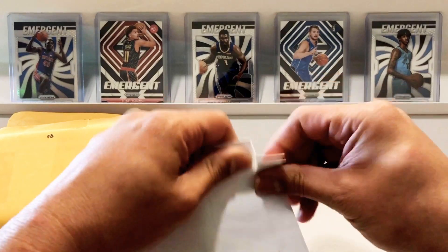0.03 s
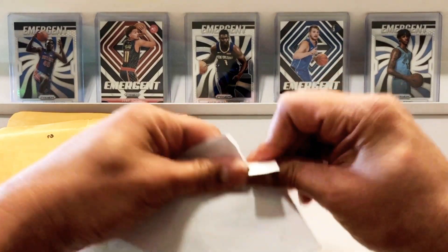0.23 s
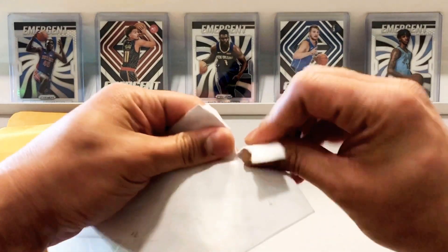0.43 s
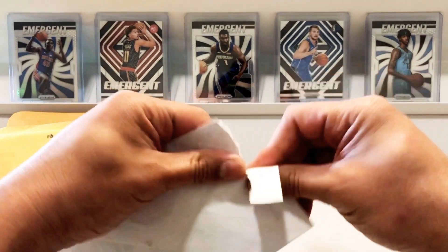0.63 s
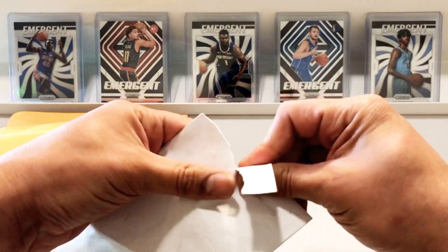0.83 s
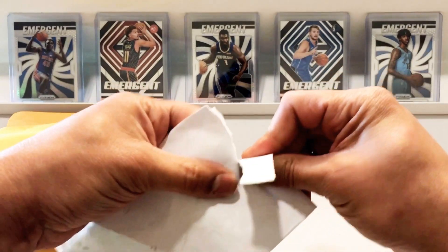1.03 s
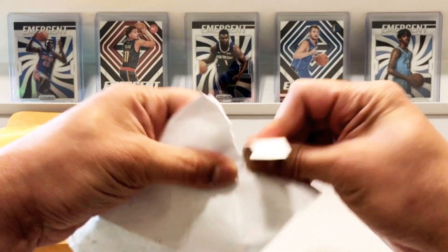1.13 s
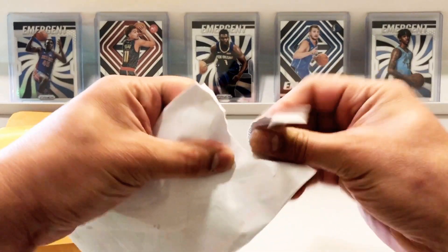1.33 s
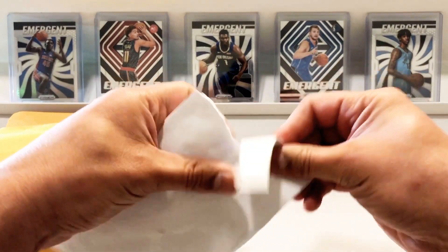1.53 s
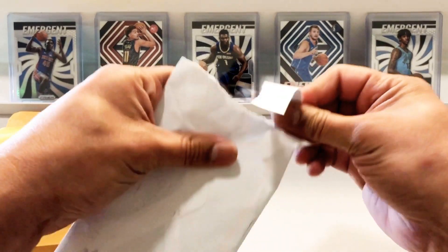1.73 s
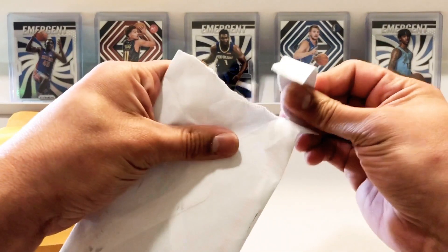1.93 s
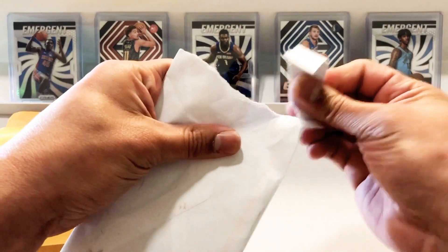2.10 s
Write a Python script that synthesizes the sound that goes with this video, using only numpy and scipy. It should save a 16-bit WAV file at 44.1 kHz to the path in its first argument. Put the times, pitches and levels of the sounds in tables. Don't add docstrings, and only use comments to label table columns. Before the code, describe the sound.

Close, dry paper tearing in a quiet indoor room, with crisp irregular crackling and hard crease snaps over soft rustle, easing midway, then one loud snap and bright ripping at the end; faint rumble and hiss beneath.

```python
import sys
import numpy as np
from scipy import signal
from scipy.fft import rfft, irfft
from scipy.io import wavfile

SR = 44100
rng = np.random.default_rng(int(sys.argv[2]) if len(sys.argv) > 2 else 0)


def generate_wav(signal):
    frames = np.transpose(np.atleast_2d(signal))
    scaled = np.clip(frames, -1, 1) * 32767
    pcm = np.round(scaled).astype(np.int16)
    wavfile.write(sys.argv[1], SR, pcm)


def level_to_linear(level):
    exponent = np.asarray(level, float) / 20
    return 10 ** exponent


N = 95432
T = np.arange(N) / SR

# f/Hz, width/Hz, level/dB
BODY = [
    (449.4, 207, 1.5),
    (625, 126, -1.5),
    (875, 151, 4),
    (1573, 226, -1.5),
    (2330, 860, -7),
]
# f/Hz, width/Hz, level/dB
EDGE = [
    (3460, 2170, -13),
    (4494, 575, -1.5),
    (5344, 880, -4),
    (7120, 2150, -8),
    (8745, 1820, -0.5),
    (10600, 1930, -5.5),
    (12300, 8300, -19.5),
    (15200, 2600, -24),
]
TILT_HZ = 6230


def rms_one(x):
    return x / np.sqrt(np.mean(x ** 2) + 1e-20)


def resonance(x, hz, width):
    r = np.exp(-np.pi * width / SR)
    poles = [1, -2 * r * np.cos(2 * np.pi * hz / SR), r * r]
    return signal.lfilter([(1 - r * r) / 2, 0, (r * r - 1) / 2], poles, x + 1e-18)


def burst(hold_s, fall_s):
    rise_s = 0.00008
    t = np.arange(int(0.03 * SR)) / SR
    return np.minimum(t / rise_s, 1) * np.exp(-np.maximum(t - hold_s, 0) / fall_s)


def random_signs(envelope):
    return envelope * rng.choice([-1., 1.], len(envelope))


def strike(s, peak_db, modes, envelope, tilt_db):
    lag_s, colour_spread_db = 0.0008, 1.5
    out = np.zeros(N + SR)
    for when, peak, tilt in zip(s, peak_db, tilt_db + 0 * s):
        push = random_signs(envelope)
        colour = colour_spread_db * rng.standard_normal(len(modes))
        hit = 0
        for k, (hz, width, level_db) in enumerate(modes):
            rung = rms_one(resonance(resonance(push, hz, width), hz, 2 * width))
            gain = level_to_linear(level_db + colour[k] + tilt * np.log2(hz / TILT_HZ))
            hit = hit + (-1) ** k * rung * np.sqrt(width) * gain
        i = int((when + lag_s) * SR)
        out[i:i + len(hit)] += level_to_linear(peak) * hit / np.abs(hit).max()
    return out[:N]


def grains(per_s, spread_db, hiss, modes, uneven=1.0, tilt_db=0):
    slip_s, slip_colour_db = 0.0011, 4
    gap, size = rng.exponential(1, (2, 2000))
    colour = slip_colour_db * rng.standard_normal((2000, len(modes)))
    at = np.cumsum((1 - uneven + uneven * gap) * SR / per_s).astype(int)
    inside = at < N
    noise = rng.standard_normal((2, N))
    out = 0
    for k, (hz, width, level_db) in enumerate(modes):
        sizes = np.zeros(N)
        sizes[at[inside]] = level_to_linear(spread_db * np.minimum(size, 2.6) + colour[:, k])[inside]
        slip_train = signal.fftconvolve(sizes, burst(slip_s / 2, slip_s))[:N]
        friction = noise[k % 2] * (hiss + rms_one(slip_train))
        rung = resonance(resonance(friction, hz, width), hz, 2 * width)
        out = out + level_to_linear(level_db + tilt_db * np.log2(hz / TILT_HZ)) * rung
    return rms_one(out)


def air():
    air_db, hum_db, hum_hz, hum_width_hz = -36.5, -65.5, 121.3, 1.36
    # f/Hz, level/dB
    air_spectrum = [
        (3, 6),
        (15, 2),
        (28, -9.5),
        (50, -25.5),
        (150, -32),
        (900, -43.5),
        (1300, -47.5),
        (16000, -70),
    ]
    hz, db = np.transpose(air_spectrum)
    f = np.maximum(np.fft.rfftfreq(N, 1 / SR), 1)
    shape = level_to_linear(np.interp(np.log(f), np.log(hz), db)) * (f > 1)
    bed = irfft(rfft(rng.standard_normal(N)) * shape, N)
    hum = resonance(rng.standard_normal(N + SR), hum_hz, hum_width_hz)[SR:]
    fade = np.clip(np.minimum(T, T[-1] - T) / 0.032 + 0.63, 0, 1)
    return level_to_linear(air_db) * fade * rms_one(bed) + level_to_linear(hum_db) * rms_one(hum)


def rustle():
    # t/s, level/dB, body level/dB
    finger_moves = [(0, -45.5, -3.5), (.11, -48.5, -14), (0.288, -49.5, -1), (.365, -59.5, 1),
                    (.41, -44, -8.5), (.56, -50, 2), (.645, -50, -6.5), (.86, -48.5, -32), (.96, -57.5, 7),
                    (1.14, -47, -2), (1.235, -58.5, -6), (1.375, -60, -7), (1.43, -48, -6.5),
                    (1.6, -41, -13), (1.705, -50, -22), (1.85, -46, -15), (1.9, -58.5, -17),
                    (2.16, -51.5, -3.5)]
    s, db, body_db = np.transpose(finger_moves)
    level = level_to_linear(np.interp(T, s, db) - 1.5)
    fine = grains(360, 3.5, 0.99, EDGE)
    dull = grains(70, 1.6, 1.0, BODY)
    return level * (fine + level_to_linear(np.interp(T, s, body_db)) * dull)


def buckles():
    kick, fall_s = 7.15, 0.0021
    # t/s, peak/dB, upper mode tilt/dB, hold/ms
    sheet_pops = [(0.019, -38, -11, 2.9), (0.079, -31.5, 0.5, 2), (0.1, -31.5, 4, 1.6),
                  (0.127, -32, 2, 3.9), (0.212, -27.5, -3.5, 3), (0.221, -35.5, 6, 1.6),
                  (0.29, -27.5, -1.5, 2.2), (0.427, -31.5, -7.5, 1.9), (0.441, -27.5, -4, 1.1),
                  (0.468, -26.5, -4.5, 2.5), (0.491, -33, 4, 1.6), (0.515, -22.5, 0, 4.8),
                  (0.547, -36.5, 7, 1.7), (0.629, -27.5, 2.5, 0.95), (0.782, -43.5, 10, 4.1),
                  (0.797, -36.5, 6.5, 0.9), (0.83, -28, 0.5, 2.5), (0.879, -27, -1, 0.87),
                  (0.9088, -21.5, -4, 1.4), (1.04, -23, 0.5, 1.6), (1.067, -29.5, -21, 1.2),
                  (1.291, -34, -4, 4.5), (1.327, -38, 0, 1.1), (1.423, -31.5, -1.5, 3.6),
                  (1.449, -34.5, 1, 3.4), (1.519, -24, -9, 5), (1.538, -33.5, 0.5, 5), (1.607, -38, 2, 2.5),
                  (1.883, -37, 1, 1.5), (2.054, -32, -8, 5.3)]
    # t/s, peak/dB, upper mode tilt/dB, hold/ms
    soft_pops = [(.049, -40, -6, 3.3), (.118, -34, 5, 1.8), (0.266, -41, -5, 1.6), (0.809, -40, 7, 1.8),
                 (1.085, -31, -4, 3), (1.195, -39, 12, 0.56), (1.281, -46, -3, 1.6), (1.3, -38, 1, 1.6),
                 (1.465, -37.5, -16, 2), (1.472, -35, -12, 3), (1.495, -35, -2, 1.8), (1.509, -31, -2, 5.6),
                 (1.533, -37, 2, 2.2), (1.556, -44, -6, 5), (1.574, -38, 2, 1.5), (1.583, -41, 0, 2)]
    out = np.zeros(N)
    for s, peak_db, upper_db, hold_ms in list(sheet_pops) + list(soft_pops):
        push = random_signs(burst(hold_ms / 1000, fall_s))
        push = np.r_[kick, push, np.zeros(len(push))]
        pop = 0
        for k, (hz, width, level_db) in enumerate(BODY):
            rung = rms_one(resonance(resonance(push, hz, width), hz, 3 * width))
            pop = pop + (-1) ** k * level_to_linear(level_db + np.log2(hz / 465) * upper_db) * rung
        i = int(s * SR)
        out[i:i + len(pop)] += (level_to_linear(peak_db) * pop / np.abs(pop).max())[:N - i]
    return out


def snaps():
    snap_db, knock_db, knock_tilt_db = -4, -15, 3.5
    # t/s, peak/dB, treble tilt/dB, body share/dB
    crease_snaps = [(0.0419, -26, -1, -10), (0.1091, -17, 5, -9), (0.1242, -7, 0, -6),
                    (0.2004, -11, -5, -2), (0.2874, -20, -10.5, -2.5), (0.3955, -20, 3.5, -25),
                    (0.4418, -13, -6, -4.5), (0.4693, -10.5, -4.5, -2.5), (0.5099, -2.5, -4, -4.5),
                    (0.5158, -11, -5.5, -2), (0.612, -21.5, -16, -3), (0.6241, -16.5, -7.5, 5),
                    (0.6587, -16, -1, -7), (0.702, -20, -6, -8), (0.8213, -24.5, -14, 14.5),
                    (0.843, -17.5, 1, 8), (0.8924, -5, -2.5, 0), (0.9086, -14, -12, -16),
                    (0.9852, -21, -8.5, 6.5), (0.9997, -15.5, -2.5, 6), (1.0205, -19, -14, 9.5),
                    (1.049, -7, 1, -35), (1.0896, -8.5, 5, -18), (1.114, -11.5, 10, -27),
                    (1.6335, -0.5, -7.5, -4.5), (1.6824, -17.5, 0, -14.5), (1.735, -18, -3, -21),
                    (1.7962, -11.5, 1.5, -10), (2.026, -0.5, -1, -5)]
    # t/s, peak/dB, treble tilt/dB
    small_ticks = [(0.0245, -25, -7), (0.0593, -25, -2.5), (0.0757, -27, -6), (0.1502, -21.5, 0),
                   (0.156, -35, 5), (0.2125, -25, -8), (0.2392, -21, -7), (0.2964, -31, -5),
                   (0.596, -19, 0), (0.6785, -22.5, -3.5), (0.7284, -32, -8), (0.7678, -25.5, -2),
                   (1.053, -12.5, 6), (1.062, -21, 3), (1.0934, -12, 3), (1.1347, -23, 10),
                   (1.1949, -25.5, -0.5), (1.425, -23, 1), (1.4967, -19.5, 1), (1.5557, -15, -1),
                   (1.7499, -15, 11), (1.784, -30, 3), (1.851, -23, 8), (1.9397, -26, 6.5),
                   (1.9804, -19.5, 6), (1.993, -17, 7), (2.035, -9, 0), (2.048, -16.5, -13),
                   (2.062, -17.5, -8)]
    # t/s, peak/dB, treble tilt/dB
    further_ticks = [(0.6204, -22, 1), (0.8298, -25, -5), (0.899, -14.5, -6), (.972, -35, 4), (1.581, -23, 3),
                     (1.595, -23, 0), (1.623, -26, -1), (1.762, -27, 11), (1.955, -32, 6), (1.273, -33, 4),
                     (1.26, -38, 4)]
    s, db, tilt, body_db = np.transpose(crease_snaps)
    tick_s, tick_db, tick_tilt = np.transpose(list(small_ticks) + list(further_ticks))
    release = burst(0.0007, 0.0012)
    crack = strike(np.r_[s, tick_s], np.r_[db, tick_db] + snap_db, EDGE, release, np.r_[tilt, tick_tilt])
    knock = strike(s, db + body_db + knock_db, BODY, release, knock_tilt_db)
    return crack + knock


def slips():
    slip_db = -4.5
    # t/s, peak/dB, treble tilt/dB
    large_slips = [(0.1576, -20.5, 1), (0.1786, -26, 0), (0.1816, -27, 6), (0.1928, -19, 5),
                   (0.207, -25, 0), (0.2175, -23, 9), (0.221, -21, -15), (1.0356, -26, 0), (1.038, -21, 2),
                   (1.0415, -25, 3), (1.0668, -23, -11), (1.07, -21, -2), (1.077, -23, 1), (1.08, -21, 5),
                   (1.0838, -16, 11), (1.0855, -15.5, 0), (1.0965, -17, 16), (1.0995, -19, 12),
                   (1.1047, -33, 8), (1.11, -19, 17), (1.1176, -10.5, 11), (1.5135, -18, -2),
                   (1.517, -12.5, 4), (1.5202, -16, -8), (1.532, -25, -14), (1.5342, -23, -8),
                   (1.5447, -26, -2), (1.7865, -22, 2), (1.793, -15, 7), (1.8028, -15, 7), (1.8047, -13, 6),
                   (1.8093, -17, 11), (1.8128, -13, 10), (1.8157, -10, 10), (1.8201, -29, 10),
                   (1.8222, -24, 7), (1.986, -19, 0), (1.9974, -13.5, -1), (2.0012, -11, 2),
                   (2.008, -12, 4), (2.0154, -10, 8), (2.0182, -16, 19), (2.022, -9, 10), (2.0394, -22, 4),
                   (2.0422, -20, 8), (2.0518, -11, -10), (2.0576, -13, 1), (2.0648, -18, 8)]
    # t/s, peak/dB, treble tilt/dB
    faint_specks = [
        (0.048, -30, -2),
        (.654, -25, -1),
        (.86, -26.5, -9),
        (1.842, -22, 6),
        (1.964, -32, 7),
        (1.967, -31, 10),
    ]
    s, db, tilt = np.transpose(list(large_slips) + list(faint_specks))
    return strike(s, db + slip_db, EDGE, burst(0.00074, 0.00058), tilt)


def rips():
    rise_s, fall_s = 0.0072, 0.0039
    # t/s, length/s, level/dB, body level/dB
    tear_runs = [(0.161, 0.1, -41, -12), (0.383, 0.036, -49, -19), (1.031, 0.023, -33.5, -14),
                 (1.06, 0.065, -36.5, -9), (1.273, 0.064, -46, -7.5), (1.504, 0.031, -35.5, -10.5),
                 (1.532, 0.028, -40, -6.5), (1.735, 0.018, -39.5, -19.5), (1.794, 0.03, -32, -20),
                 (1.986, 0.045, -32, -18), (2.03, 0.037, -29.5, -9.5)]
    edge, body = np.zeros(N), np.zeros(N)
    for s, length, db, body_db in tear_runs:
        run = np.clip((T - s) / rise_s, 0, 1) * np.exp(-np.maximum(T - s - length, 0) / fall_s)
        edge += level_to_linear(db) * run
        body += level_to_linear(db + body_db) * run
    fibres = grains(450, -1, 0.42, EDGE, uneven=0.35, tilt_db=2)
    sheet = grains(220, 0.78, 1.0, BODY)
    return edge * fibres + body * sheet


def room(x):
    room_db, t60_s, cut_hz = -18, 0.34, 3700
    t = np.arange(int(0.3 * SR)) / SR
    tail = rng.standard_normal(len(t)) * level_to_linear(-60 * t / t60_s) * np.clip(t / 0.0031, 0, 1)
    tail = signal.sosfilt(signal.butter(1, cut_hz, fs=SR, output="sos"), tail)
    return level_to_linear(room_db) * signal.fftconvolve(x, tail / np.sqrt(np.sum(tail ** 2)))[:N]


def scene():
    paper = rustle() + buckles() + snaps() + slips() + rips()
    return (air() + paper + room(paper))[None]


def roll_off(x):
    return signal.sosfilt(signal.butter(12, 16830, fs=SR, output="sos"), x)


def record(dry):
    low_pass = signal.cheby2(10, 45, 16700, fs=SR, output="sos")
    mix = signal.sosfilt(low_pass, dry)
    return roll_off(mix)


dry = scene()
out = record(dry)
generate_wav(out)
```